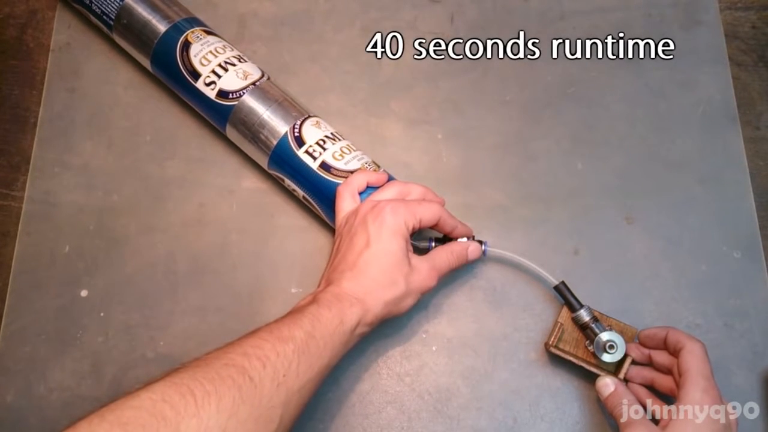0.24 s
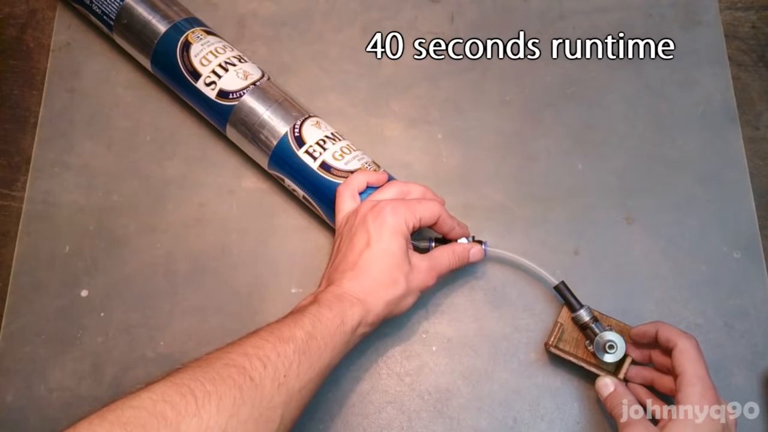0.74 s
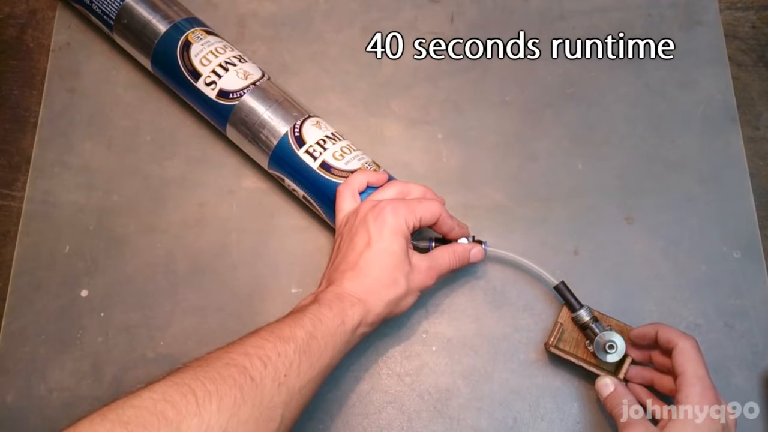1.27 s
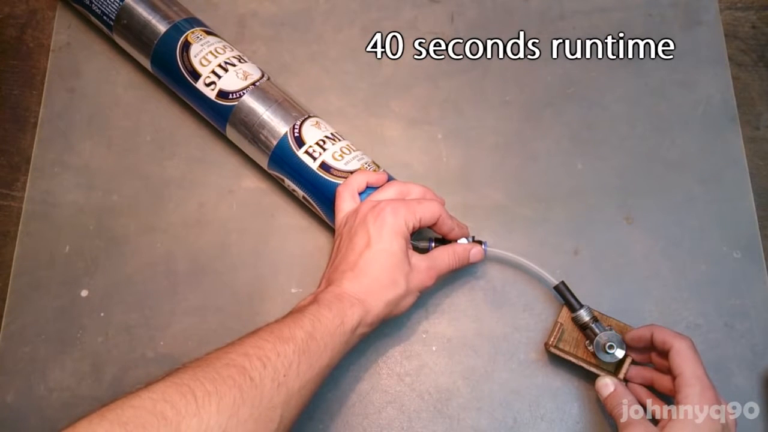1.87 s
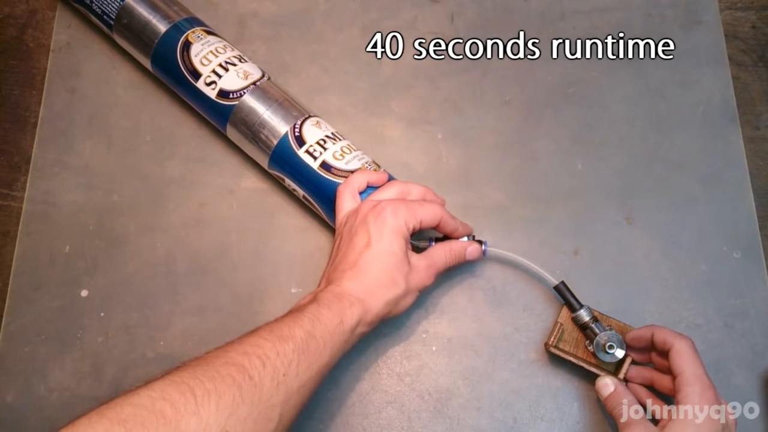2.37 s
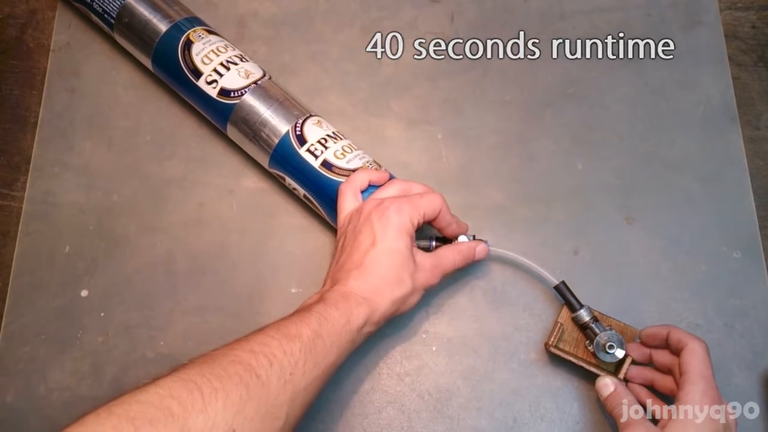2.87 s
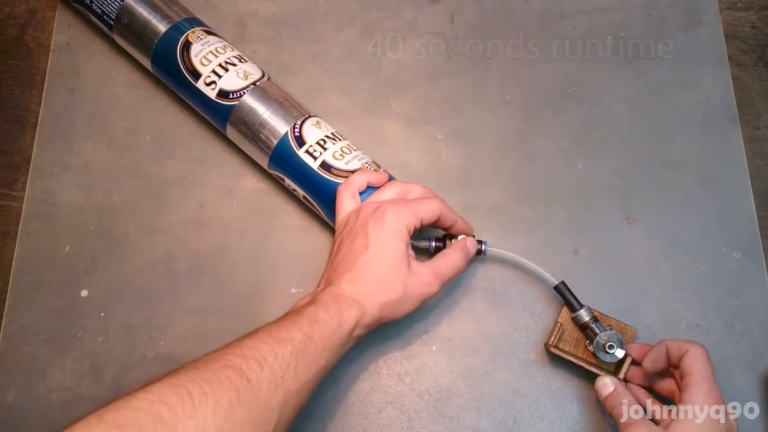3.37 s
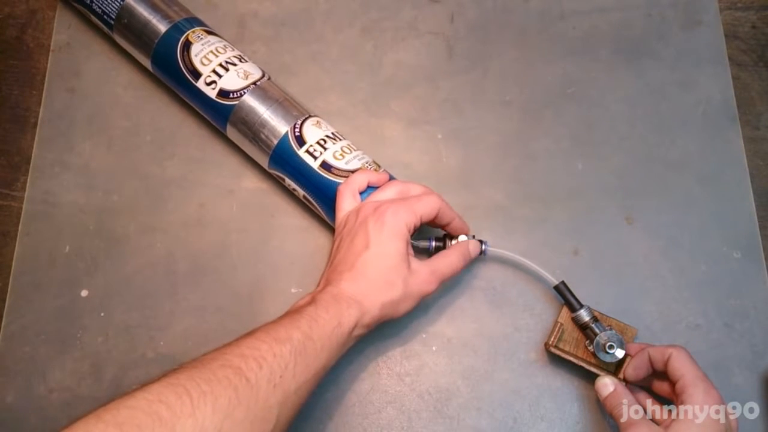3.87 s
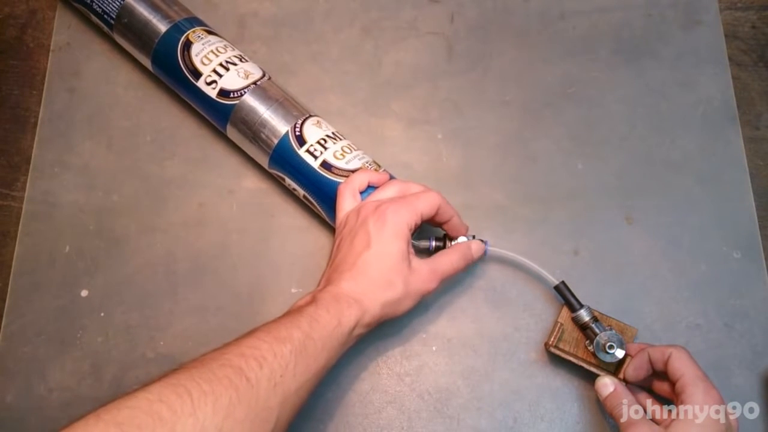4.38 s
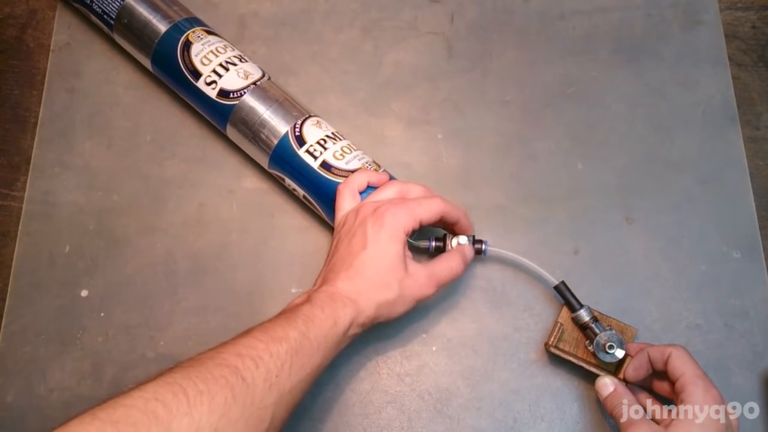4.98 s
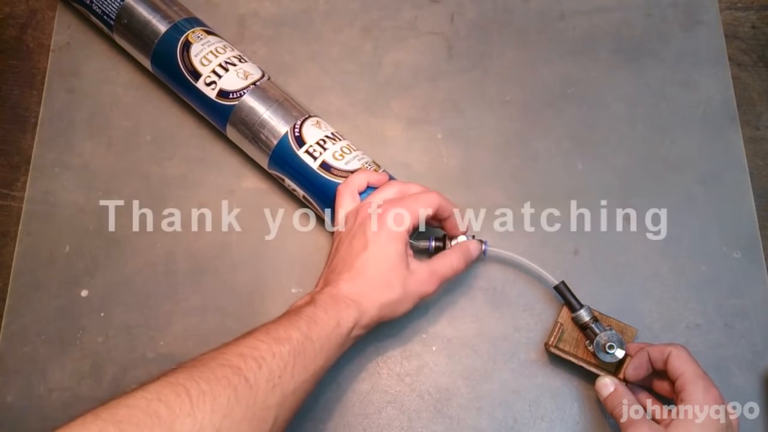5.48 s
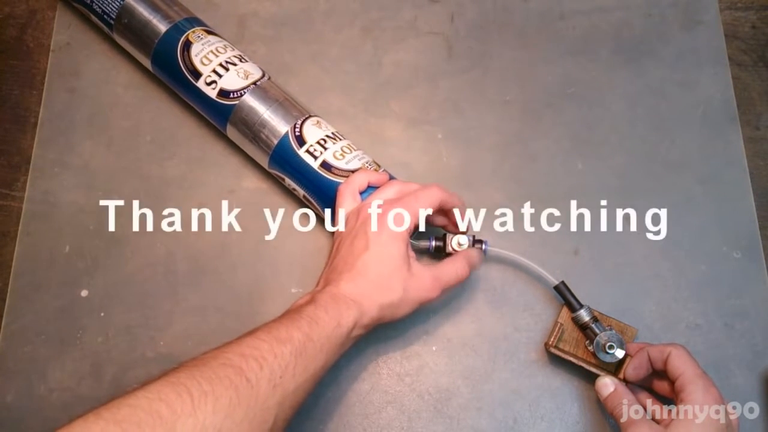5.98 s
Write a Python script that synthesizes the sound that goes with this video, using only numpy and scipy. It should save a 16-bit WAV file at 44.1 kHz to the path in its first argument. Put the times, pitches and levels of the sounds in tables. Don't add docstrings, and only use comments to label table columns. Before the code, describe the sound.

Fast popping exhaust from a tiny compressed-air engine sags in pitch, stops abruptly, leaving a bright hiss that wavers with the valve and dies away.

```python
import sys
import numpy as np
from scipy import signal
from scipy.io import wavfile
from scipy.ndimage import uniform_filter1d

SR = 44100
rng = np.random.default_rng(int(sys.argv[2]) if len(sys.argv) > 2 else 0)


def master_out(mix):
    frames = np.transpose(np.atleast_2d(mix))
    ceiling = np.clip(frames, -1, 1)
    pcm = np.round(ceiling * 32767).astype(np.int16)
    wavfile.write(sys.argv[1], SR, pcm)


def convert_level_to_amplitude(level_db):
    exponent = np.asarray(level_db, float) / 20
    return 10 ** exponent


N = 274743
LAST_POP_S, STALL_S = 1.93, 2.0
FULL_SPEED = 39.9502


def evened(x):
    return x / np.sqrt(np.mean(x ** 2) + 1e-20)


def read(points, hz):
    f, value = np.transpose(points)
    return np.interp(np.log(hz + 1), np.log(f + 1), value)


def sides(lean_db):
    return convert_level_to_amplitude(np.array([[lean_db / 2], [-lean_db / 2]]))


def highpass(order, hz):
    return signal.butter(order, hz, "high", fs=SR, output="sos")


# frequency in Hz, likeness from 0 to 1.
SAME = [(60, 0.68), (130, 0.45), (250, 0.85), (700, 1), (1500, 0.33), (3000, 0.86), (7000, 0.84),
        (15000, 0.16)]


def air(colour, lean, patchy_db, flicker_db, size=512):
    frames, hz = 4 * N // size + 5, np.fft.rfftfreq(size, 1 / SR)
    a, b, c, d, patches = rng.standard_normal((frames, len(hz), 5)).T
    patches = evened(uniform_filter1d(uniform_filter1d(patches, 12, 0), 16, 1))
    flicker = evened(uniform_filter1d(rng.standard_normal(frames), size=3))

    same = np.clip(read(SAME, hz), -1, 1)[:, None]
    left = a + 1j * b
    right = same * left + np.sqrt(1 - same ** 2) * (c + 1j * d)

    side_db = read(lean, hz)[:, None] / 2
    frame_s = np.arange(frames) * size / 4 / SR
    level_db = colour(hz[:, None], frame_s) + patchy_db * patches + flicker_db * flicker
    spectra = np.array([left, right]) * convert_level_to_amplitude(level_db + np.array([side_db, -side_db]))
    return evened(signal.istft(spectra, nperseg=size, noverlap=3 * size // 4)[1][:, :N])


# frequency in Hz, strength in dB per Hz.
ROOM = [(20, -4.5), (40, -1), (78, -7.5), (145, -9), (220, -16), (265, -17.5), (350, -14), (600, -22.5),
        (1000, -19), (1500, -12.5), (2500, -34)]
# time in seconds, half width in seconds, depth in dB.
LULLS = [(2.38, .07, -20), (2.55, 0.22, -6), (3.2, 0.077, -24), (4.1, 0.49, -7), (4.37, 0.031, -22),
         (4.68, 0.064, -11), (5.13, .05, -5), (5.53, 0.049, -49), (5.93, 0.11, -18)]


def room():
    rumble = convert_level_to_amplitude(-59.5) * air(lambda hz, _: read(ROOM, hz), LEAK_LEAN, patchy_db=1.4, flicker_db=-0.5, size=4096)
    t = np.arange(N) / SR
    waver = evened(uniform_filter1d(uniform_filter1d(rng.standard_normal(N), 5000), 5000))
    drone_hz = 75.1 + 0.96 * waver
    lull_db = sum(db * np.exp(-((t - s) / width) ** 2) for s, width, db in LULLS)
    drone = convert_level_to_amplitude(-60.5 + lull_db + 3.5) * np.sin(2 * np.pi * np.cumsum(drone_hz) / SR)
    return rumble + drone


# delay in seconds, left dB, right dB.
ECHOES = [(0, 2, -8), (.0008, -55, -61), (.0033, -48, -5), (.0052, -16.5, -12.5), (.0068, -19, -18),
          (.009, -66, -6.5)]


def bench(x):
    taps = np.zeros((2, 8000))
    at = np.arange(200, 7980, 20) + rng.integers(0, 20, (2, 389))
    fade = convert_level_to_amplitude(-60 * at / SR / 0.38)
    np.put_along_axis(taps, at, rng.choice([-1., 1.], at.shape) * fade, 1)
    taps *= convert_level_to_amplitude(np.array([[-8.], [-2.5]])) / np.linalg.norm(taps[0])
    for s, left_db, right_db in ECHOES:
        taps[:, round(s * SR)] += convert_level_to_amplitude(np.array([left_db, right_db]))
    return signal.fftconvolve(x, taps, axes=1)[:, :N]


def speed(t):
    sag = 1.80315 * t ** 2.79007
    stall = 33.057 * np.exp((np.minimum(t, STALL_S) - STALL_S) / .04981)
    return np.maximum(FULL_SPEED - sag - stall, 0) * (t < STALL_S)


def dying_db(t):
    return -250 * np.maximum(t - 1.94, 0)


def pop_level_db(lost):
    return np.maximum(-25 - 13.5 * lost, -32)


# multiple of the crank speed, level in dB, left minus right in dB.
THRUM = [(1, -56.5, 17), (2, -51, 13.5), (3, -56.5, 12), (4, -52, -10), (5, -69, -2), (6, -55, 0)]


def thrum(t, turns, lost, luck):
    heave_db = 61 * np.minimum(lost, .2)
    shake = 0
    for k, db, lean_db in THRUM:
        level = convert_level_to_amplitude(db + (k > 5.5) * heave_db)
        shake = shake + level * sides(lean_db) * np.sin(2 * np.pi * round(k) * turns)
    return shake * convert_level_to_amplitude(2.1 * (pop_level_db(lost) + 25.0) + dying_db(t) + 0.97 * uniform_filter1d(luck, 1000))


# frequency in Hz, strength in dB per Hz.
RATTLE = [(30, -6), (100, -10), (200, 1), (450, 1), (800, -12), (1500, -40)]


def rattle(t, port_db):
    noise = air(lambda hz, _: read(RATTLE, hz), [(100, -2), (800, 3)], patchy_db=-1.0, flicker_db=1.0, size=2048)
    return convert_level_to_amplitude(-50.5 + dying_db(t) + 0.27 * port_db) * noise


# part of a turn from 0 to 1, opening in dB.
PORT = [(0, -9), (.03, 0), (.33, -1.5), (.48, -8), (.7, -11), (.95, -12), (1, -9)]


def port_opening(t, turns, lost, luck):
    running = t < LAST_POP_S
    linger = 1.15 + 2.9 * lost * running
    port_db = np.interp((turns % 1) ** linger, *np.transpose(PORT)) + 0.65 * luck * running
    return np.where(t > LAST_POP_S, 0.36 * port_db, port_db)


# time in seconds, opening in dB.
VALVE = [
    (2.22, -0.9),
    (2.44, -3.5),
    (2.55, -3.5),
    (2.675, -3.5),
    (2.72, -7.5),
    (2.8, -6),
    (3.12, -0.5),
    (3.5, -2),
    (3.75, -0.5),
]


def flow(t):
    lost = np.minimum(1 - speed(t) / FULL_SPEED, .25)
    warmup_db = -7 * np.exp(-t / 0.36)
    running = -30 + warmup_db, -2.5 + 16 * lost, -2.5

    drain_db = -0.8152 * np.maximum(t - STALL_S, 0) ** 2.182
    valve_db = np.interp(t, *np.transpose(VALVE))
    surge_db = 2.5 * np.exp(-((t - STALL_S) / .2) ** 2)
    treble_db = 1.1 + 0.16 * drain_db + 0.74 * valve_db - .6 * surge_db
    low_db = 0.13 * valve_db - 0.77 * surge_db
    still = -30 + surge_db + drain_db + valve_db, treble_db, low_db

    stalled = np.clip((t - 1.86) / (STALL_S - 1.86), 0, 1)
    return [a + stalled * (b - a) for a, b in zip(running, still)]


# frequency in Hz, strength in dB per Hz.
LEAK = [(150, -41.5), (600, -22.5), (1100, -26.5), (1560, -18), (2200, -13.5), (2750, -11), (4300, -6),
        (4500, -5.5), (5600, -3.5), (5850, -6), (6910, -13.5), (7920, -9.5), (14000, -7.5), (15900, -9)]
# frequency in Hz, width in Hz, lift in dB.
WHISTLES = [(1340, 16, 10), (2170, 200, -9), (2890, 360, 5.5), (4615, 72, 12), (4653, 63, -7),
            (4750, 150, 6), (5138, 277, 7.5), (5420, 120, 1.5), (5950, 92, -10.5), (7660, 100, -0.5),
            (7820, 110, 2), (8720, 180, 2.5), (9060, 65, -4), (9700, 110, 4), (10500, 87, 6.5),
            (12600, 89, -0.5), (12700, 80, -4), (13430, 260, 4), (14200, 130, 7.5), (14600, 150, -2)]


def leak_colour(hz, t):
    _, treble_db, low_db = flow(t)
    lifts = sum(db / (1 + (2 * (hz - f) / width) ** 2) for f, width, db in WHISTLES)
    treble = np.clip((hz - 5800) / 1500, 0, 1)
    low = np.clip((4200 - hz) / 1000, 0, 1)
    return read(LEAK, hz) + lifts + treble * treble_db + low * low_db


# frequency in Hz, left minus right in dB.
LEAK_LEAN = [(60, 1.0), (110, 1.7), (200, 0.5), (380, 0.54), (700, 2.3), (1290, 4), (2380, 0.81),
             (4400, 5.6), (8120, 11), (15000, 7.5)]


def leak(t, port_db):
    noise = air(leak_colour, LEAK_LEAN, patchy_db=0.9, flicker_db=0.56, size=1024)
    return convert_level_to_amplitude(flow(t)[0] + 7.5 + port_db) * noise


# frequency in Hz, strength in dB per Hz.
JET = [(600, -28), (1000, -13), (1500, -9.5), (2200, -12.5), (3010, -5.5), (3930, -10.5), (4680, -4.5),
       (7190, -8.5), (9940, -3), (12500, -4), (15900, -7.5)]
# frequency in Hz, left minus right in dB.
JET_LEAN = [(60, 12), (110, 5.9), (200, 0.5), (380, 1.5), (700, 2.7), (1290, 3.8), (2380, 0.77),
            (4400, 1.7), (8120, 9.9), (15000, 4)]


def jet(t, lost, port_db):
    jet_db = np.maximum(-18.5 - 24 * lost, -34)
    noise = air(lambda hz, _: read(JET, hz), JET_LEAN, patchy_db=1.5, flicker_db=-1.5)
    return convert_level_to_amplitude(jet_db + 1.5 + 0.85 * port_db + dying_db(t)) * noise


# frequency in Hz, level in dB.
CRACK = [(800, -16), (2000, -31.5), (3200, -15.5), (5000, -7.5), (7000, -10), (8500, -0.5), (10500, 4),
         (13000, -8), (16000, 1)]


def cracks(t, lost, fired, luck):
    crack_db = -27.5 - 0.5 * lost
    u = t[:300]
    shape = u / 0.0012 * np.exp(1 - u / 0.00074)
    burst = signal.oaconvolve(fired * convert_level_to_amplitude(crack_db + 23.5 + 0.28 * luck), shape)[:N]
    return burst * air(lambda hz, _: read(CRACK, hz), JET_LEAN, patchy_db=3.5, flicker_db=-1.5)


START_TURN = .5085
# frequency in Hz, level in dB, time to fade 60 dB in seconds,
# left minus right in dB.
BODY = [(278.8, -2, 0.11, 5.5), (312, -2.5, 0.047, 1), (353.2, 10.5, 0.097, 2.5), (456, 4.5, 0.035, -4),
        (500.3, 3, 0.061, 6.5), (601, 3.5, 0.077, 10), (622, -2.5, 0.064, -14), (711.6, -1, 0.13, 3.5),
        (755.5, -7.5, 0.1, 12), (863, -7.5, 0.05, 25.5), (995, -17, 0.12, 6.5), (1047, -9, 0.11, 19),
        (1097, -6, 0.074, -4), (1160, -17, 0.26, 6), (1245, -15, 0.11, -23), (1331, -8, 0.066, 23.5),
        (1518, -13.5, 0.031, 26), (1596, -6.5, 0.12, -5), (1680, -17, .04, 26), (1865, -17, 0.1, 11),
        (2270, -36, .03, 5)]


def pops(t, lost, fired, luck):
    u = t[:5000]
    ring = 0
    for hz, db, t60, lean_db in BODY:
        ring = ring + convert_level_to_amplitude(db - 60 * u / t60) * np.sin(2 * np.pi * hz * u) * sides(lean_db)
    kick_hz = 490
    ring += convert_level_to_amplitude(0.5) * np.tanh(2.5 * np.sin(2 * np.pi * kick_hz * u)) * (u < 1 / kick_hz)
    ring *= np.sqrt(SR / 20 / np.sum(ring ** 2))

    x = signal.oaconvolve(fired[None] * convert_level_to_amplitude(pop_level_db(lost) + .5 * luck), ring, axes=1)[:, :N]
    earlier = ring[:, round(START_TURN / FULL_SPEED * SR):]
    x[:, :earlier.shape[1]] += convert_level_to_amplitude(-25) * earlier
    rest = round(1.962 * SR)
    x[:, rest:rest + len(u)] += convert_level_to_amplitude(-47) * ring

    x -= np.clip(1.45 * lost, 0, .8) * signal.sosfiltfilt(highpass(2, 520), x)
    x = signal.lfilter(*signal.butter(2, 190, "high", fs=SR), x)
    return signal.sosfiltfilt(highpass(3, 228), x)


def motor():
    t = np.arange(N) / SR
    turns = START_TURN + np.cumsum(speed(t)) / SR
    lost = 1 - speed(t) / FULL_SPEED
    luck = rng.standard_normal((100, 3))[turns.astype(int)].T
    fired = (np.diff(np.floor(turns), prepend=0) > 0) * (t < LAST_POP_S)
    port_db = port_opening(t, turns, lost, luck[0])
    hiss = leak(t, port_db) + jet(t, lost, port_db) + cracks(t, lost, fired, luck[1])
    knocks = thrum(t, turns, lost, luck[0]) + rattle(t, port_db) + pops(t, lost, fired, luck[2])
    return hiss, knocks


def scene():
    hiss, knocks = motor()
    edges = signal.sosfilt(highpass(2, 1000), knocks)
    return bench(hiss + convert_level_to_amplitude(-16.0) * edges) + knocks + room()


def low_pass(x):
    return signal.sosfilt(signal.butter(12, 16520, fs=SR, output="sos"), x)


def record(dry):
    clipped = np.clip(dry, -1, 1)
    lowpass = signal.firwin(2047, 15770, window=("kaiser", 9), fs=SR)
    limited = signal.oaconvolve(clipped, lowpass[None], "same")
    return low_pass(limited)


dry = scene()
out = record(dry)
master_out(out)
```